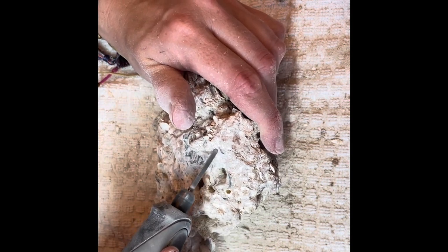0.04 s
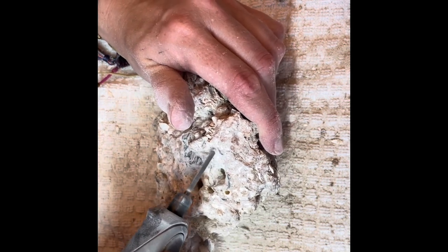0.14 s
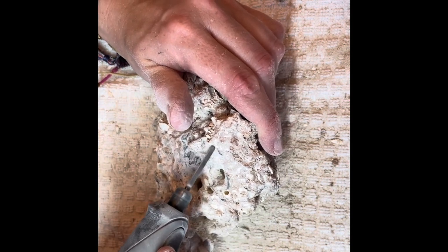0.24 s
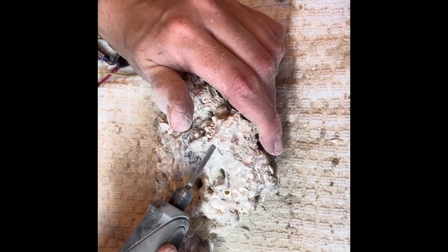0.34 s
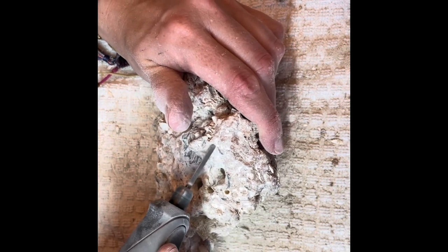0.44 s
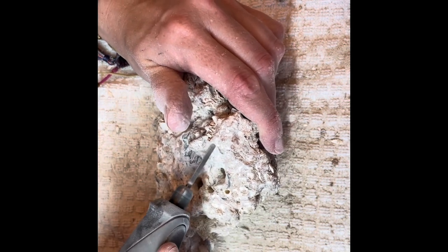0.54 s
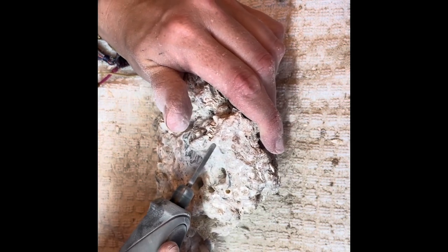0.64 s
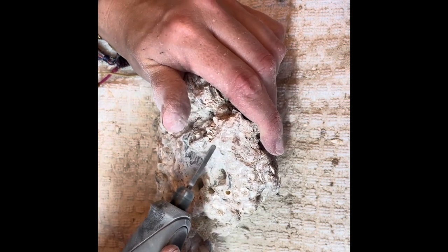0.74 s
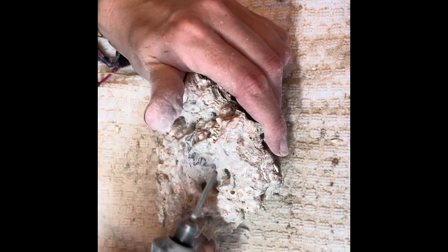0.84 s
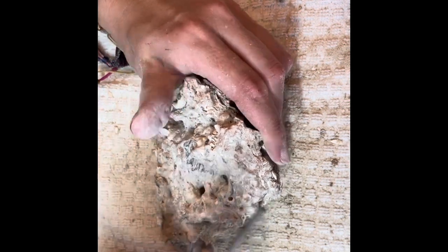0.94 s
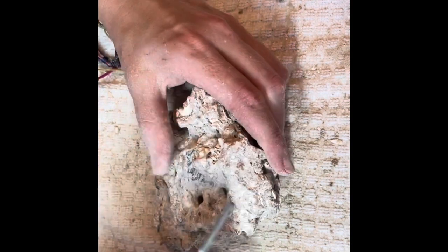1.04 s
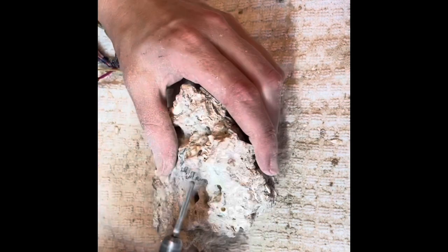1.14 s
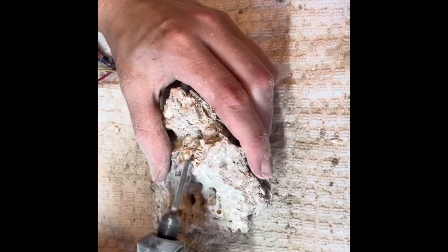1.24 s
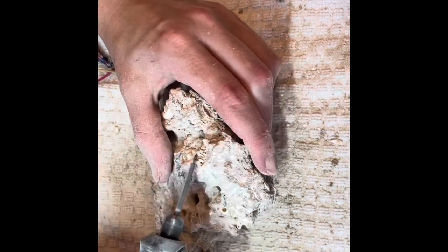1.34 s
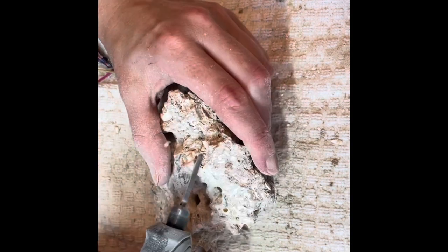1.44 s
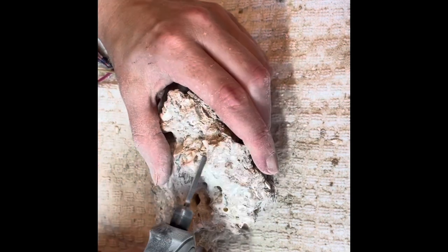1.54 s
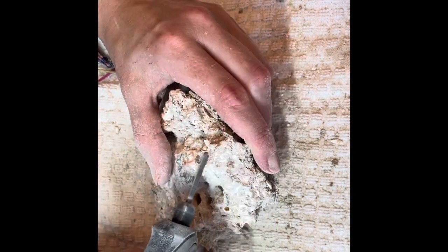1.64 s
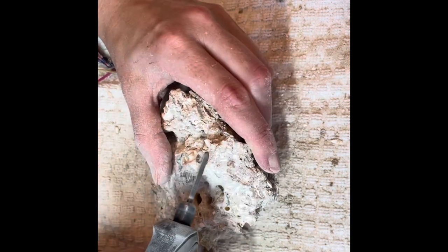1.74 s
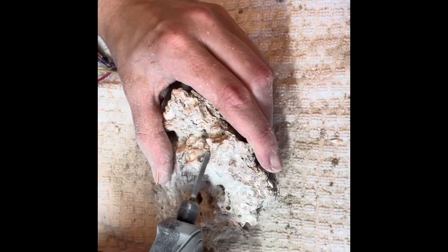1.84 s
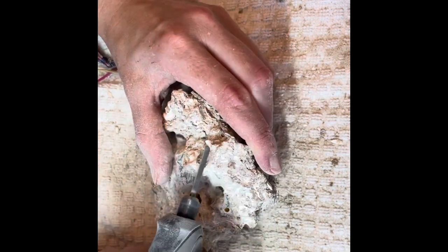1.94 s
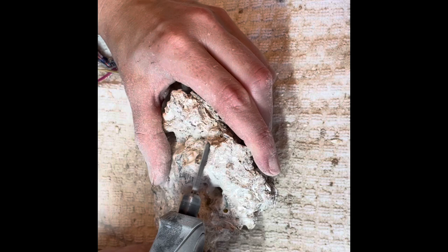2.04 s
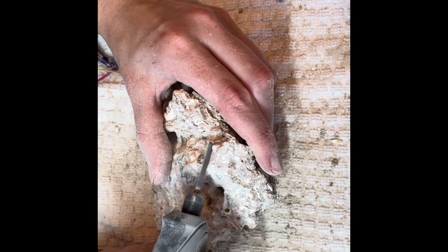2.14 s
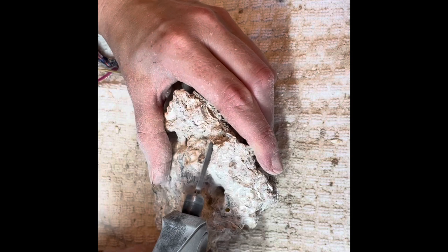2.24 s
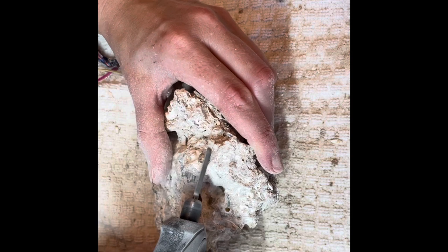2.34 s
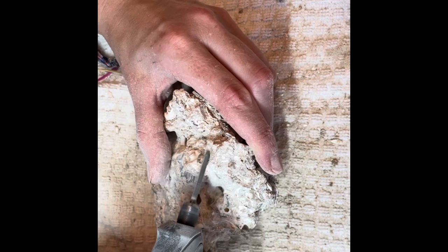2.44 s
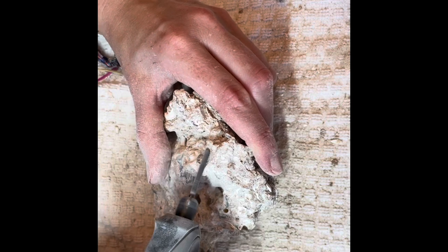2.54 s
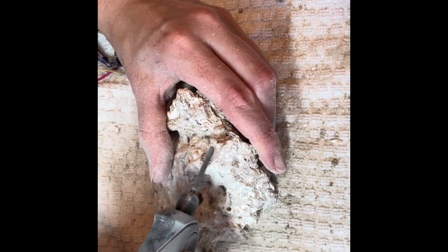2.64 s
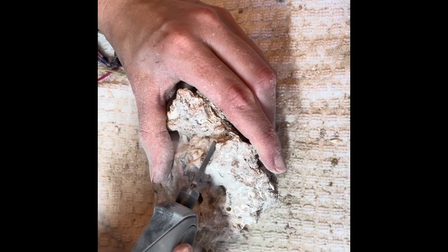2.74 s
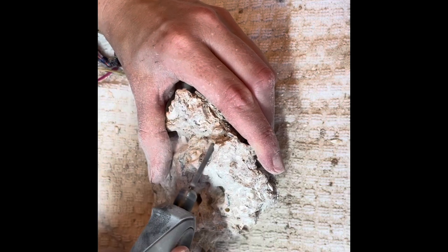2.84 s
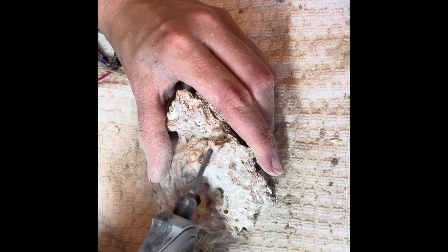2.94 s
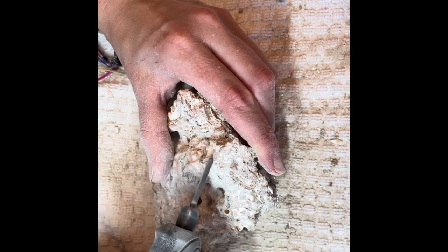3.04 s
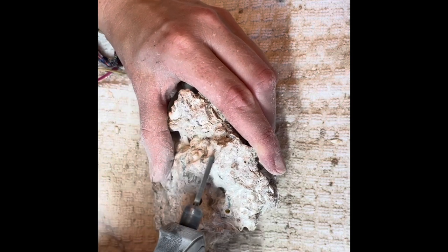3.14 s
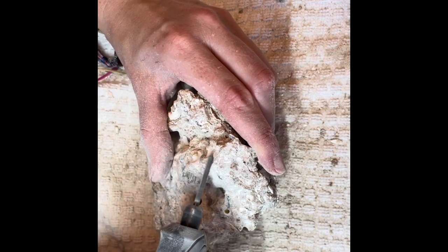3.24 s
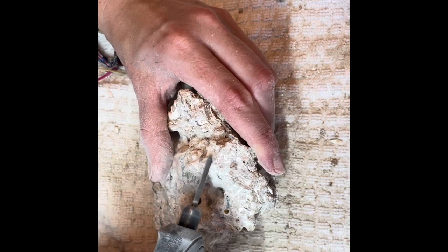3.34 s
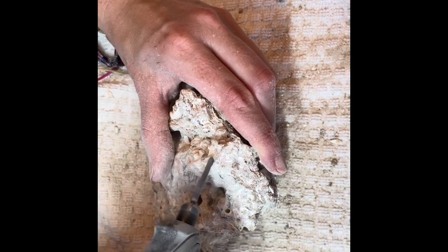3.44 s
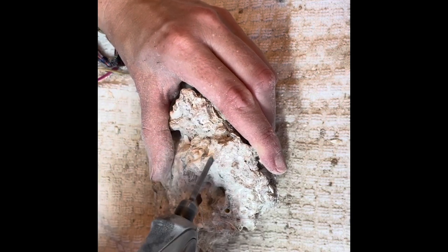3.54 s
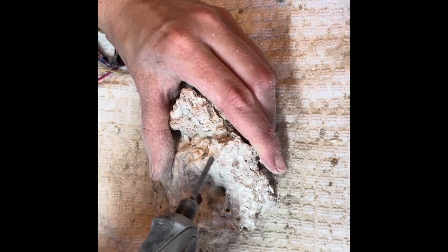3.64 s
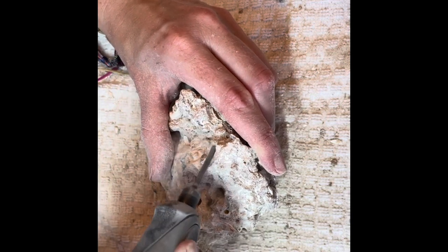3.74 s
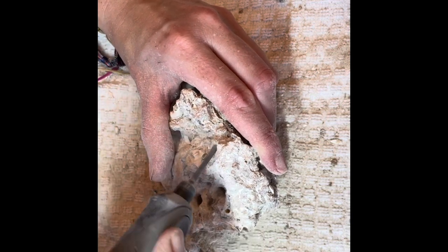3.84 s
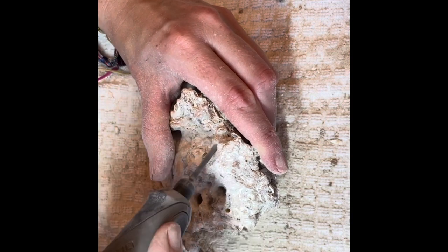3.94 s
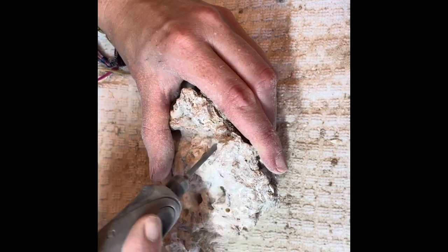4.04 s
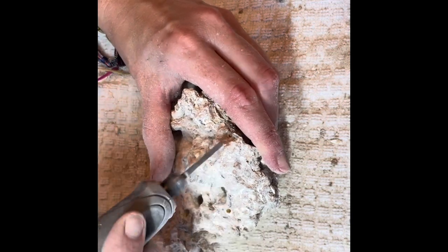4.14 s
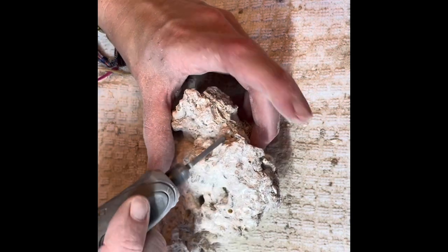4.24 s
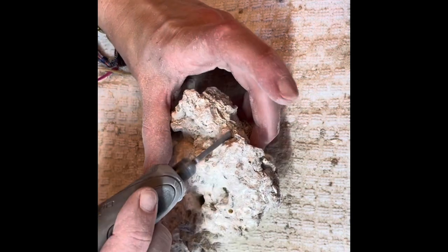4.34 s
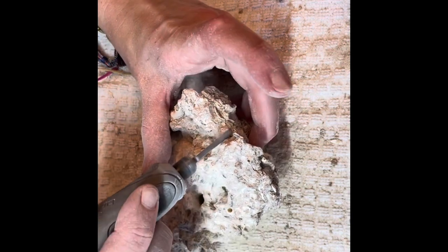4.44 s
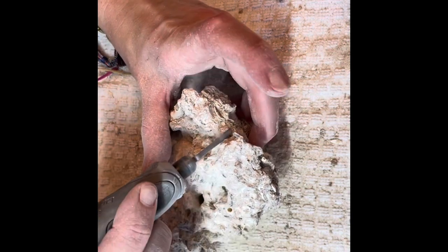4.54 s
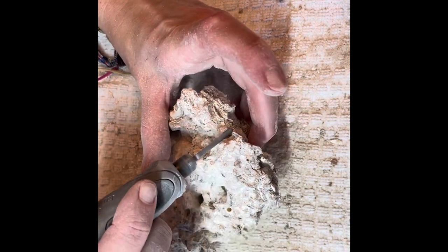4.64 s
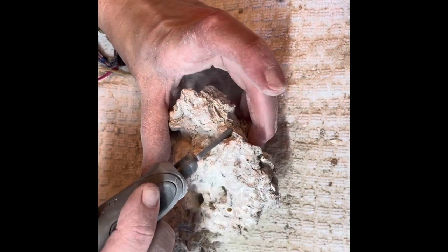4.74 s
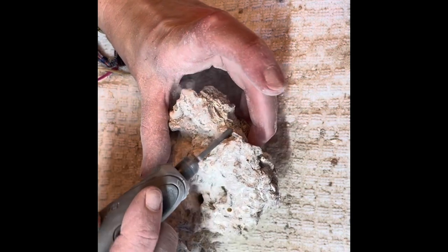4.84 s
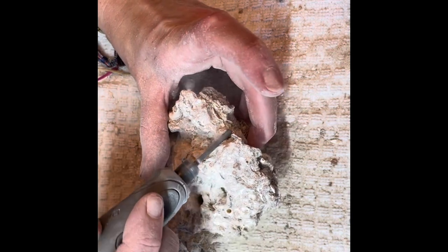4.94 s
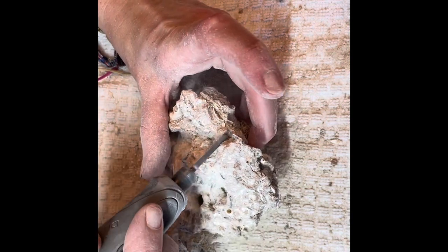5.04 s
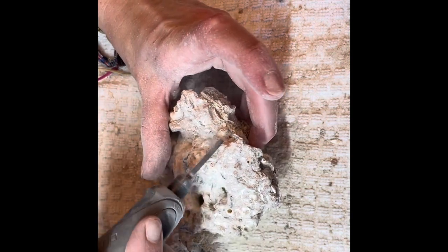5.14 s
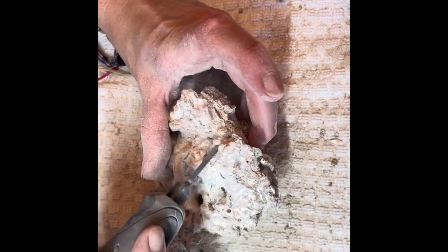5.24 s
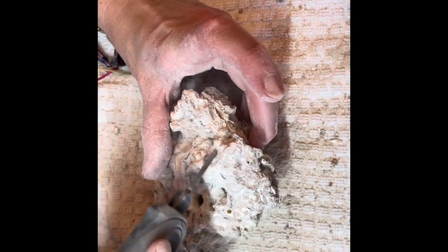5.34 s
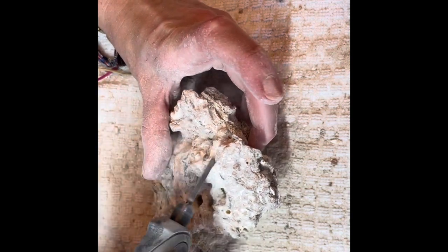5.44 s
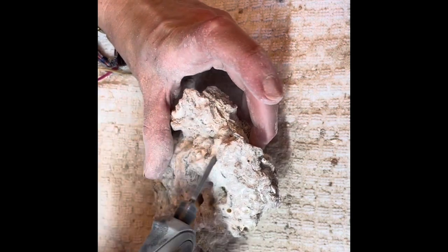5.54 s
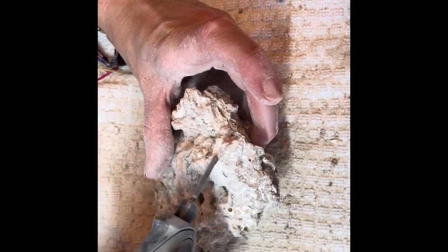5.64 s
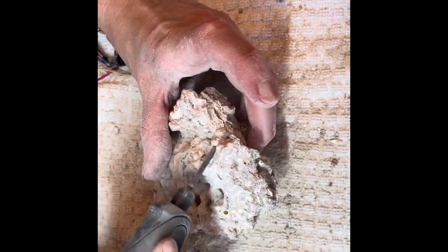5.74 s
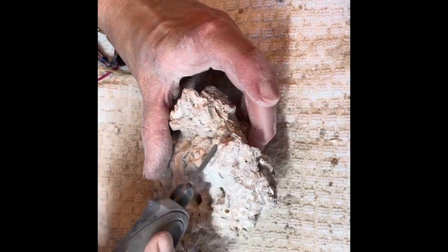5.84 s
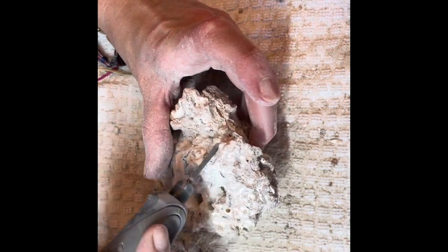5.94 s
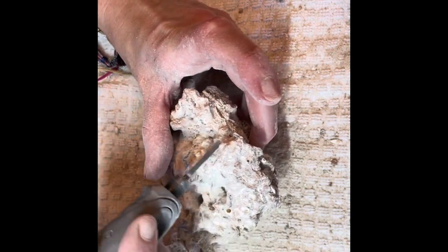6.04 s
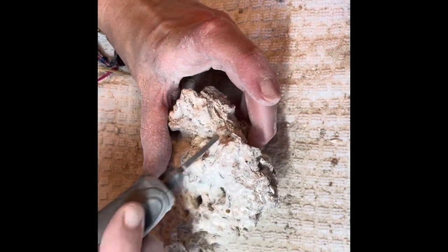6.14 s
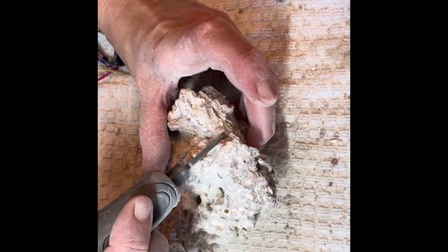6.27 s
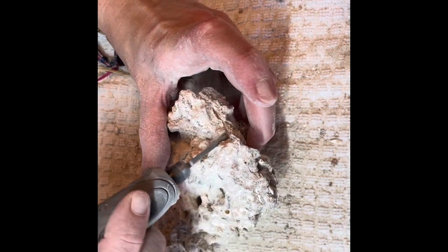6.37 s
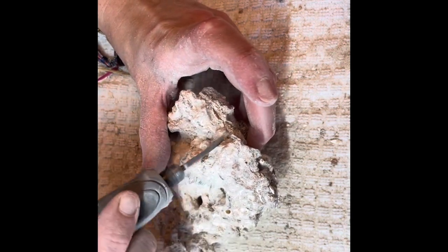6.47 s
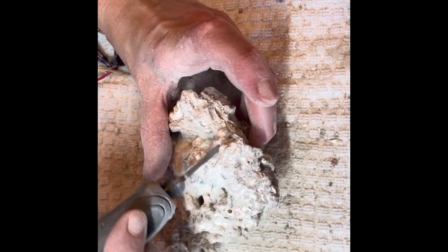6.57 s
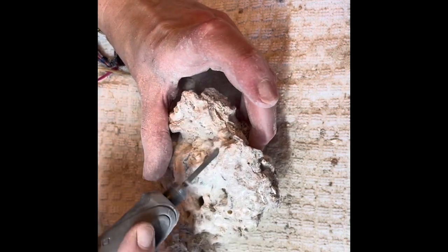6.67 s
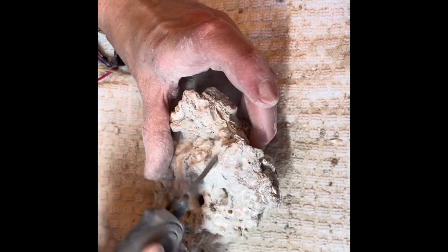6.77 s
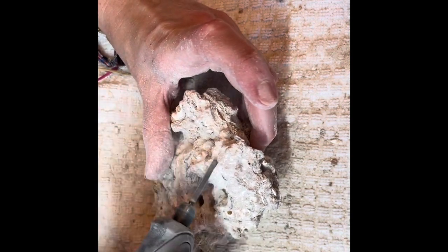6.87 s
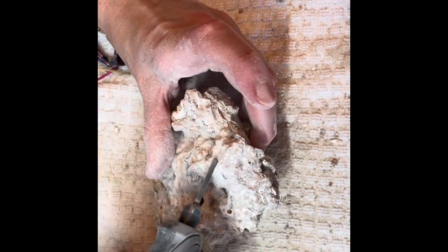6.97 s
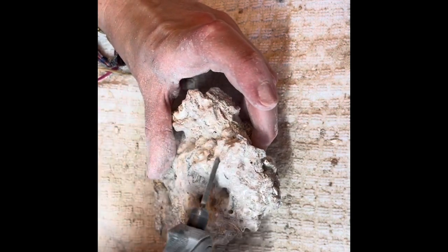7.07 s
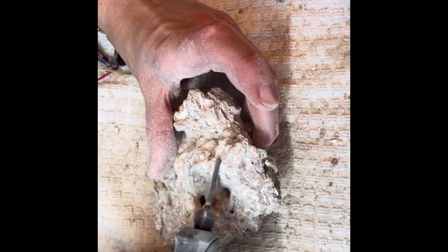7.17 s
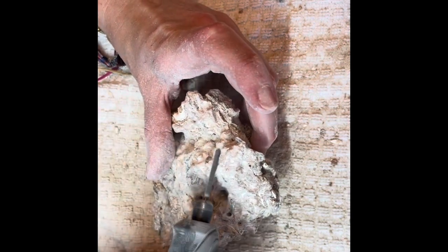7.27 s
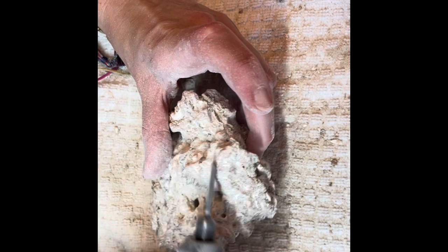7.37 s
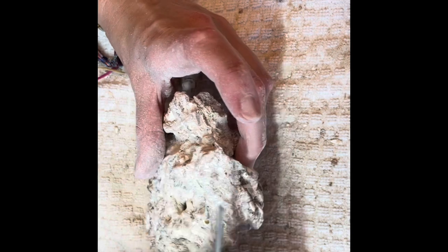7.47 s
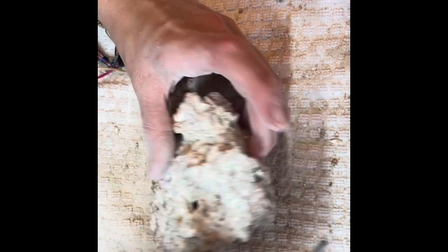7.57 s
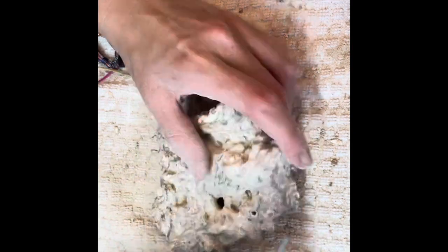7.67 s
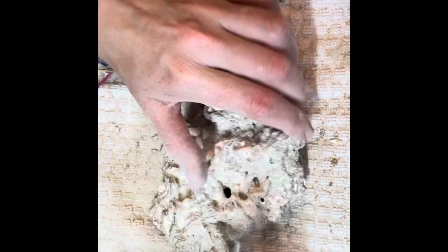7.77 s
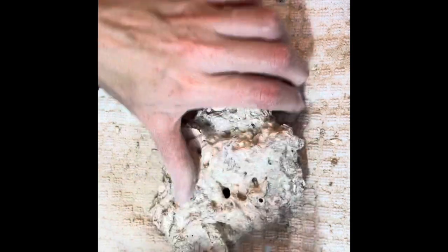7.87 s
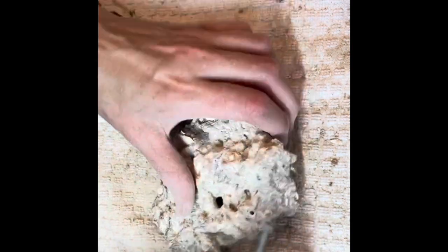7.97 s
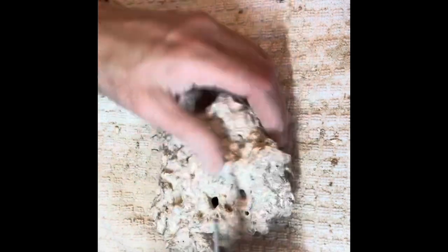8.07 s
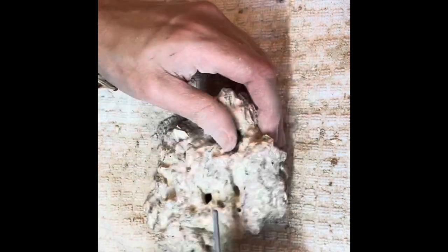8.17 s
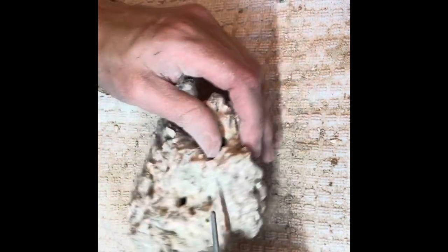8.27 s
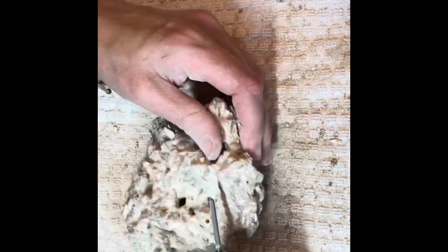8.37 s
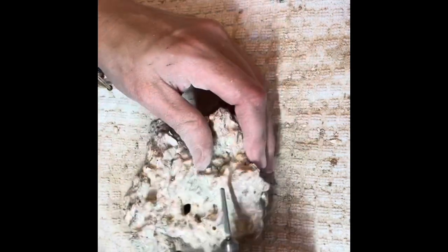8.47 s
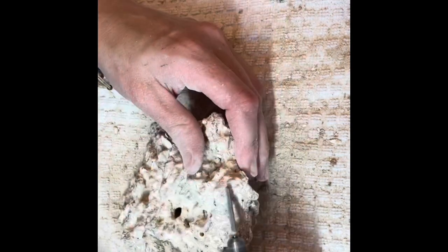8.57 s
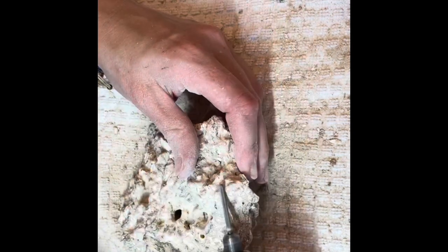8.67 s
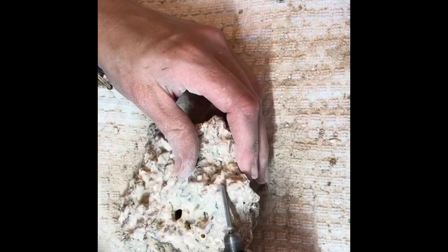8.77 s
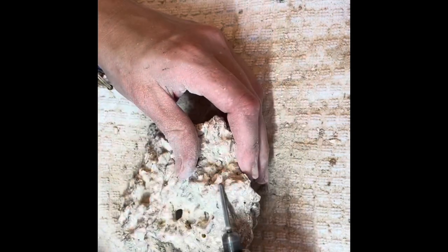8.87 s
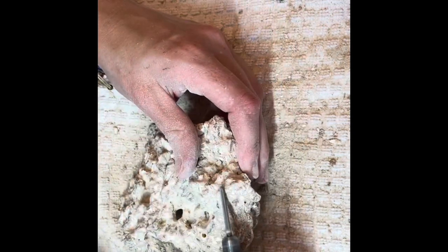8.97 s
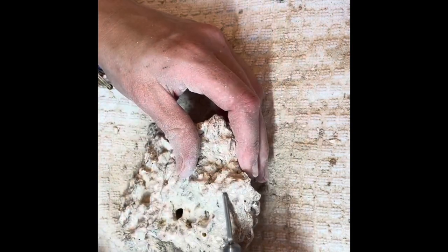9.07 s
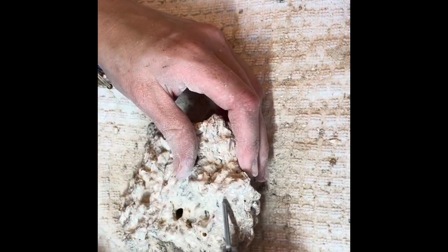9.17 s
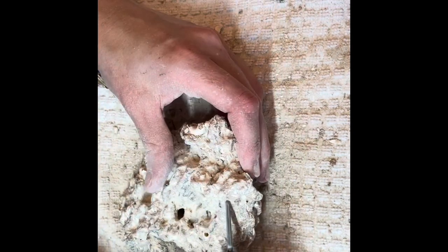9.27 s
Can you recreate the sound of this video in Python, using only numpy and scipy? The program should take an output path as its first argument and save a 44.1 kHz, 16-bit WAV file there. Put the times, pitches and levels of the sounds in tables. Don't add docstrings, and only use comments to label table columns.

```python
import sys
import numpy as np
from scipy import signal
from scipy.fft import rfft, irfft, next_fast_len
from scipy.io import wavfile
from scipy.ndimage import uniform_filter1d

SR = 44100
rng = np.random.default_rng(int(sys.argv[2]) if len(sys.argv) > 2 else 0)


def volts_from_decibels(level):
    exponent = np.asarray(level, float) / 20
    return 10 ** exponent


def put_to_file(sound):
    columns = np.atleast_2d(sound).T
    safe = np.clip(columns, -1, 1)
    whole_steps = np.round(safe * 32767)
    wavfile.write(sys.argv[1], SR, whole_steps.astype(np.int16))


N = 410571

# touch in seconds, lift in seconds, skid before seating in seconds,
# easing before the lift in seconds, entry level in dB.
STROKES = [
    (0.0, 0.081, 0.0046, 0.0064, 4),
    (0.232, .772, 0.18, 0.014, 0.8),
    (1.48, 4.134, 0.061, 0.035, -2),
    (4.284, 6.1, 0.073, 0.07, -3),
    (6.177, 7.361, 0.063, 0.031, -2),
    (8.649, 9.132, 0.032, 0.012, -2.5),
    (9.219, 9.369, 0.018, .005, -5.5),
]
# start in seconds, level in dB, decay in seconds.
TOUCHES = [(0.223, -34.5, 0.0043), (0.875, -54, .03), (1.045, -52, 0.033), (1.14, -50, .035),
           (1.451, -26, 0.0018), (1.469, -31, 0.0043), (4.1757, -39.5, 0.005), (4.183, -41.5, 0.008),
           (4.289, -43, .005), (4.208, -46.5, 0.016), (4.228, -41, 0.0099), (4.238, -38, 0.0078),
           (7.37, -42, 0.0057), (7.376, -37, 0.0072), (7.385, -47, 0.003), (7.65, -57, .02),
           (7.95, -54, 0.037), (8.6584, -55, 0.0055), (9.22, -43, 0.004)]
# time in seconds, speed in Hz.
PASSES_HZ = [
    [(0.0, 396.6), (.078, 437)],
    [(.233, 480.6), (.29, 468.4), (.37, 449), (.41, 431), (.47, 417.3), (.61, 388.2), (.68, 380.6),
     (.73, 391.7), (.775, 424.3)],
    [(1.48, 484), (1.58, 465.4), (1.62, 447), (1.74, 438.2), (1.82, 428.2), (1.91, 405.6), (1.94, 411),
     (1.98, 438)],
    [(2.1, 435.6), (2.18, 428.7), (2.26, 415.3), (2.37, 404.5), (2.5, 418), (2.55, 404.7), (2.66, 380),
     (2.735, 354.5)],
    [(2.79, 381), (2.88, 380.7), (2.94, 402.4), (3.02, 437), (3.12, 453.4), (3.26, 424.4), (3.34, 404),
     (3.38, 401.4), (3.46, 375.6)],
    [(3.55, 378.2), (3.66, 402), (3.7, 409), (3.74, 384.4), (3.78, 395), (3.82, 388.6), (3.87, 396.2),
     (3.99, 374.2), (4.06, 388), (4.146, 452)],
    [(4.28, 483.2), (4.34, 449.7), (4.47, 351.7), (4.51, 346), (4.73, 337.2), (4.815, 290), (4.86, 296),
     (4.9, 276.8), (4.94, 281)],
    [(4.99, 272.5), (5.03, 345), (5.06, 362.2), (5.18, 400), (5.26, 410.6), (5.3, 408), (5.39, 427.2),
     (5.6, 401)],
    [(5.7, 420), (5.74, 412.7), (5.78, 425.4), (5.82, 411), (5.94, 393.5), (6.05, 413.5), (6.1, 449.6)],
    [(6.177, 474.3), (6.24, 456), (6.32, 424), (6.46, 395), (6.54, 397.8), (6.61, 389.2), (6.76, 399.4),
     (6.8, 411)],
    [(6.88, 398), (6.97, 387.6), (7.04, 388.2), (7.12, 376.2), (7.26, 396.7), (7.36, 460)],
    [(8.645, 488.5), (8.7, 477), (8.78, 446), (8.93, 413.6), (8.98, 436.7), (9.02, 444), (9.06, 436.4),
     (9.13, 466.5)],
    [(9.219, 476.4), (9.31, 461)],
]
# time in seconds, pressure in dB, hollowness of the rock in dB.
LEAN = [(0.0, -45.5, -1), (.33, -48.5, 5.5), (.7, -45.5, 2), (1.5, -47, 4), (1.57, -42.5, -4.5),
        (1.85, -42.5, -2), (2.15, -46, -9), (2.75, -47, -1.5), (3.2, -48, -10.5), (3.47, -45, -7),
        (4.0, -46.5, 0.5), (4.5, -48, 1), (5.0, -46.5, 0), (5.6, -47.5, 0), (6.07, -47.5, 3), (6.4, -48, 3),
        (7.3, -47, -3.5), (8.8, -48, -1.5)]
# time in seconds, firmness in dB, half length in seconds, ring in Hz.
BITES = [(0.436, 6.5, 0.022, 3100), (0.655, 6.5, 0.13, 3270), (1.658, 3.5, 0.05, 3130),
         (1.794, 2.5, 0.071, 3240), (1.898, 5, 0.029, 3130), (1.992, 3.5, 0.018, 4130),
         (2.29, 4, 0.076, 3220), (2.505, 4, 0.073, 3320), (2.713, 3.5, 0.022, 3000), (2.91, 3, 0.084, 3240),
         (3.31, 2.5, 0.066, 3100), (3.42, 1, 0.024, 2400), (3.516, 2, .11, 3420), (3.687, 2, 0.028, 3180),
         (3.848, 4, 0.066, 3100), (4.43, 5, 0.036, 2980), (4.542, 6.5, 0.063, 3300), (4.652, 6, .03, 3100),
         (4.77, 4.5, 0.029, 2860), (4.937, 6, 0.085, 2361), (5.062, 6, 0.034, 3290), (5.14, 0, .04, 3150),
         (5.253, 6, 0.095, 3130), (5.45, 6, 0.11, 3350), (5.892, 6.5, 0.056, 3340), (6.285, 7, 0.015, 3640),
         (6.382, 4, 0.055, 3380), (6.47, 2.5, 0.062, 3600), (6.566, 4, 0.033, 3300),
         (6.666, 4, 0.035, 3350), (6.805, 5.5, 0.022, 3300), (6.917, 3, 0.075, 3300),
         (7.024, 3.5, .04, 3500), (7.17, 2, 0.07, 3040), (8.801, 6, 0.056, 3300), (8.915, 2.5, .015, 3200),
         (8.947, 6.5, 0.017, 3200), (9.024, 4.5, .03, 3300), (9.103, 4, 0.025, 2900),
         (9.263, -0.5, 0.055, 3400)]
# time in seconds, loose grit in dB, half length in seconds,
# level in dB.
GRAIN = [(0.437, -11, 0.037, 0.5), (0.528, 5.5, 0.055, -2), (0.608, -15, 0.06, 0.5), (0.7, -14, 0.02, 0.5),
         (1.585, 4, 0.02, 2.5), (1.765, -11.5, 0.056, 0.5), (1.846, -7.5, 0.037, 1.7),
         (1.895, 5, 0.044, -0.2), (1.99, -9, 0.032, -1), (2.056, 7, 0.021, -0.1), (2.21, 2.5, 0.028, 0),
         (2.32, 6, 0.026, 0), (2.366, -4, 0.053, 1), (2.575, 8, 0.051, -2), (2.715, 6, .02, 0),
         (2.955, -6, 0.034, -0.5), (3.112, -8, 0.042, 1), (3.203, -8, 0.029, 0.7), (3.404, -8, 0.062, 1.3),
         (3.51, -13, 0.018, 0.5), (3.622, -5, 0.07, 0.5), (3.69, 11.5, 0.044, -1.8),
         (3.817, -3, 0.035, 1.3), (3.914, -8, 0.02, 0.8), (4.46, 4.7, 0.045, 1.1), (4.562, 3, 0.038, 2.5),
         (4.61, 2, .015, -2.5), (4.722, 3, 0.022, -2), (4.848, 2, 0.016, -2.5), (4.873, -2, 0.015, 2.5),
         (5.004, 9, 0.041, -3), (5.11, 4.5, 0.06, -0.1), (5.204, -8, 0.015, 1.7), (5.288, -4, 0.05, 0),
         (5.382, 8.5, 0.029, -1.5), (5.704, 12, 0.045, -0.7), (5.847, -7, 0.055, -0.5),
         (6.374, -5, 0.025, -0.5), (6.472, 10, 0.031, -1.2), (6.56, 8.5, 0.085, -0.5),
         (6.707, -16, 0.054, 1), (6.765, 7.5, 0.025, 0.5), (7.023, 3.5, 0.06, -0.5),
         (7.15, -5.5, 0.057, -0.3), (7.267, 8, 0.033, -0.3), (8.743, -7, 0.034, 3), (8.82, -11, 0.035, 1.2),
         (9.022, -10, 0.047, 1), (9.245, -8, 0.024, 3)]
# time in seconds, gain in dB,
HOLLOWS = [(.05, -4.5, 0.076, 3040), (1.6, 3.5, 0.087, 5100), (1.8, 3.5, 0.072, 1400),
           (2.0, 9, 0.039, 4500), (2.06, 8.5, 0.024, 4860), (2.38, 3, .1, 4100), (2.71, 6, 0.038, 2960),
           (2.95, 4.5, .08, 4740), (3.12, 8, .1, 4370), (3.41, 5, 0.026, 5330), (3.7, 4.5, 0.03, 3200),
           (4.45, 8, 0.089, 2200), (4.47, 3, 0.037, 5700), (4.65, 8, 0.18, 5600), (4.79, 3, 0.049, 5140),
           (4.88, 3, 0.033, 4900), (4.8, 3, 0.17, 2640), (5.25, -4, 0.14, 4730), (6.35, -2.5, 0.17, 2100),
           (6.55, 1, 0.14, 3470), (6.9, -5.5, 0.22, 2170), (7.276, 5.5, 0.052, 4800),
           (8.76, 7.5, 0.053, 5500), (8.88, 6, 0.085, 5900), (8.95, 4.5, 0.088, 1300),
           (9.26, 4.5, .05, 3700), (.45, 1.5, .07, 1500), (1.744, 3, .1, 2200), (4.93, 0.5, 0.046, 2400),
           (9.08, 8.5, 0.057, 1600), (.3, 9, .06, 650), (2.35, -6, .15, 640), (3.15, -6, .2, 640),
           (4.63, 6, 0.07, 690), (5.55, 7, .3, 680), (6.45, 9, 0.28, 660), (7.0, 5, 0.11, 960),
           (8.9, -6, .25, 640), (3.42, 4, 0.044, 2300), (2.2, -1.5, 0.083, 4400), (.63, -5, 0.1, 2550),
           (4.78, 3.5, .03, 3420), (4.893, 3, 0.028, 3300), (4.6, -7, .12, 480)]
# frequency in Hz, level in dB per Hz.
STONE = [(520, -32), (640, -31), (1000, -18.5), (1300, -14.5), (2100, -12.5), (3200, -3), (3900, -9),
         (5100, -8.5), (6100, -10), (7400, -3.5), (9000, -8.5), (11000, -4), (13000, -7.5), (15500, -12.5)]
# time in seconds, level in dB.
THRUM = [(0.0, -88), (.33, -86), (.77, -97), (1.5, -86), (1.7, -85.5), (2.3, -90.5), (2.62, -90),
         (3.47, -88.5), (4.75, -89), (5.55, -88), (5.99, -89.5), (3.8, -94), (2.0, -88), (1.0, -97),
         (6.95, -87), (7.15, -92), (9.0, -102)]
# frequency in Hz, level in dB per Hz.
BENCH = [(60, -35), (130, -5), (170, 3), (230, -5.5), (300, -11.5), (460, -24), (900, -32)]
# time in seconds, whine in dB, brush hiss in dB, once-a-turn tone in dB,
# its octave in dB.
IDLE = [(.16, -59.5, -68.5, -93, -78), (.83, -60, -68, -101, -78.5), (.9, -56.5, -67, -87, -78.5),
        (1.25, -56.5, -68, -85, -84.5), (4.2, -61, -73, -94.5, -78), (6.15, -61.5, -71.5, -90.5, -76),
        (7.55, -62, -67.5, -99, -92), (7.9, -61, -66.5, -87, -108), (8.3, -61.5, -73, -103, -110),
        (8.6, -61, -71, -100, -95), (8.68, -67, -74, -84, -97), (8.8, -62, -73, -103, -96),
        (9.18, -64, -69.5, -104, -85.5), (9.28, -57, -66, -75, -74)]
# time in seconds, level in dB.
UNBALANCE_TOP = [(0, -76.5), (.33, -87), (.62, -75), (1.6, -82.5), (1.8, -77), (2.4, -84.5), (2.7, -75),
                 (3.0, -84), (3.3, -83.5), (3.6, -74), (4.0, -78.5), (4.5, -80.5), (5.1, -78), (5.4, -82.5),
                 (5.9, -78), (6.75, -79), (7.2, -78.5), (8.9, -78)]
# multiple of half the shaft speed, level in dB.
WHINE = [(5, -14.5), (7, -18.5), (9, -18), (11, -7.5), (13, -8.5), (15, -21), (17, -11), (21, -14),
         (30, -8.5), (32, -11.5), (36, -14)]
GRIP = {6: [(0, -14.5), (.9, -11), (1.14, -26.5), (7.48, -12), (8.08, -18)], 8: [(0, -14), (.9, -15.5),
        (7.4, -9), (8.4, -22.5)], 10: [(0, -5.5), (.85, -4), (1.14, -9), (7.58, -2.5), (8.1, -12),
        (8.4, -1)], 12: [(0, -13.5), (.8, -0.5), (1.18, 4), (2.0, -11), (7.38, 5), (7.5, -2), (7.6, -22),
        (7.7, -4), (8.0, -4), (8.1, 1.5), (8.4, 3), (9.1, 6)], 14: [(0, -5), (.8, -14), (1.14, -5.5),
        (7.0, -26), (7.68, -1.5)], 16: [(0, -15), (1.24, -9), (8.0, -24), (8.4, -14)], 18: [(0, -12.5),
        (1.24, -13.5), (7.0, -16), (7.68, -7), (7.98, -10.5), (8.42, -23)], 20: [(0, -11), (1.03, -10),
        (1.24, -18.5), (7.0, -17), (8.08, -25), (8.4, -20)]}
# time in seconds, level in dB.
WOBBLING = [
    (0, -15),
    (.84, -10),
    (1.13, 4.5),
    (1.45, -12),
    (7.92, -1),
    (8.64, -11),
    (9.1, 2),
]
# frequency in Hz, level in dB per Hz.
HOUSING = [(300, 2.5), (700, -19), (1100, -17), (1450, -11.5), (2200, -7), (2900, -1.5), (3400, -10),
           (3700, -14), (4400, -14), (5800, -23.5), (7500, -12), (9000, -16.5), (11500, -14),
           (15500, -18.5)]
# frequency in Hz, level in dB per Hz.
AIR = [(15, -44), (25, -22), (76, -1), (151, -11), (310, -11), (361, -14), (479, -28), (900, -38),
       (1170, -48), (1980, -120)]
# time in seconds, gain in dB.
LOW_AIR_LEVEL = [(0, 3.5), (2.1, 1), (4.1, 0), (5.3, -2), (7.5, 0), (8.7, 4)]
# frequency in Hz, level in dB.
HUM = [
    (87, -99.5),
    (177, -106),
    (317.6, -99),
    (538, -107),
]
# frequency in Hz, left lead in radians.
PORTS = [(300, 0.059), (800, 0.68), (1500, 0.058), (3300, 0.36), (4000, 1.26), (6100, 0.53), (7000, 0.83),
         (8300, 0.15), (9100, 1.36), (10200, 2.19), (11500, 4.22), (13000, 4.14), (15300, 6.5)]
# frequency in Hz, share in dB.
DIFFUSE = [(100, -31), (400, -21), (800, -16), (1600, -23), (3000, -16), (4200, -13.5), (6000, -9.5),
           (7500, -16), (9500, -16.5), (12000, -12.5), (14300, -6.5)]
# low edge in Hz, high edge in Hz.
SUM_GAP_HZ = (10466, 12940)
# low edge in Hz, high edge in Hz.
DIFFERENCE_GAPS_HZ = [(1500, 3200), (7000, 8800), (14600, 22050)]
SUM_WHOLE_S = [.23, 1.45, 4.19, 4.29, 5.2, 6.18, 7.36, 7.385, 8.65, 9.22]

FREE_HZ, RECOVER_S = 484, .036
RING_HZ, SCRAPE_DB, BODY_DB = 3300, 4.5, -11.5
BODY_YIELDS = 1.33
LIGHT_DB, LIGHT_HZ, EASE_DB = -7, 22.8, -11
SKID_DB = 13
HOLLOW_WIDTH = 0.13
THRUM_S, STILL_DB = .12, -99
UNBALANCE_DB_PER_HZ = 0.24
SHIFT_S = .05
TOP_HZ = 15850


def grinding(turns, speed_hz):
    touching, unseated = contact()
    lean_db, hollow_db = curves(LEAN)
    at_s, firm_db, half_s, bite_hz = np.transpose(BITES)
    firm_db, shift_hz = swells(at_s, half_s, firm_db, bite_hz - RING_HZ)
    ring_hz = RING_HZ + shift_hz
    at_s, crumb_db, half_s, surge_db = np.transpose(GRAIN)
    crumb_db, surge_db = swells(at_s, half_s, crumb_db, surge_db)

    scrape_db = SCRAPE_DB - firm_db
    body_db = BODY_DB - BODY_YIELDS * firm_db + hollow_db + 2.5 * wobble(9)
    light_db = LIGHT_DB * np.exp((speed_hz - FREE_HZ) / LIGHT_HZ)
    press_db = lean_db + light_db - scrape_db + surge_db

    bite = np.exp(0.3 * np.cos(2 * np.pi * turns + 1.51 * wobble(12)))
    grit = unit(bite * volts_from_decibels(2.2 * wobble(900)) * rng.standard_normal(N))
    strike = unit(bite * relief(turns + .0045 * wobble(60), lasting=14))
    chatter = volts_from_decibels(0.36 * wobble(35) + 1.1 * wobble(110))
    loose_db = 2 * wobble(22) + crumb_db + SKID_DB * unseated - .7 * (firm_db - 2)

    def mix(base_db):
        share = volts_from_decibels(base_db + loose_db)
        return (strike + share * grit) / (1 + share ** 2) ** 0.39

    clear = 1 / (1 + volts_from_decibels(3.6 * scrape_db - 2.8 + 0.71 * crumb_db + SKID_DB * unseated))
    rasp = band(mix(-6), STONE, low_hz=1900, high_hz=4300)
    singing = song(turns, speed_hz, ring_hz, width_hz=340 - 20 * np.clip(firm_db, 0, 8))
    middle = np.sqrt(clear) * singing + np.sqrt(1 - clear) * rasp
    upper = volts_from_decibels(scrape_db + 1.5) * band(mix(-4.5), STONE, low_hz=4300, high_hz=16500)
    lower = volts_from_decibels(body_db + .1) * band(mix(-12), STONE, low_hz=550, high_hz=1900)
    cut = touching * chatter * volts_from_decibels(press_db) * patchy(middle + upper + lower, depth_db=0.84)
    return cut + brief_touches(grit) + bench_shake(turns, touching)


def contact():
    t = np.arange(N) / SR
    touching, unseated = np.zeros(N), np.zeros(N)
    for touch_s, lift_s, skid_s, ease_s, entry_db in STROKES:
        gate = np.clip(np.minimum((t - touch_s) / 0.00042, (lift_s + 0.0088 - t) / 0.023), 0, 1)
        easing_db = EASE_DB * np.exp(-abs(lift_s - t) / ease_s)
        entering_db = entry_db * np.exp(-((t - touch_s) / skid_s) ** 2)
        touching += gate * volts_from_decibels(easing_db + entering_db)
        unseated += np.exp(-((t - touch_s) / skid_s) ** 4) + np.exp(-((t - lift_s) / ease_s) ** 2)
    return touching, unseated


def song(turns, speed_hz, ring_hz, width_hz):
    angle, speed, ring = np.float32([2 * np.pi * (turns % 1), speed_hz / width_hz, ring_hz / width_hz])
    tones, power = 0, 0
    for k in range(5, 13):
        gain = np.exp(.45 * wobble(50)) / (1 + (k * speed - ring) ** 2) ** 1.5
        tones = tones + gain * np.sin(k * angle + .8 * wobble(60))
        power = power + gain * gain
    return np.sqrt(2) * tones / np.sqrt(uniform_filter1d(power, size=900))


def relief(turns, lasting, size=128):
    fresh = rng.standard_normal((4200, size))
    keep = np.exp(-1 / max(lasting, .1))
    worn = signal.lfilter([1], [1, -keep], fresh, axis=0)
    angle = (turns % 1 * size).astype(int)
    return unit(worn[turns.astype(int) + 50, angle])


def patchy(x, depth_db):
    hz, t, z = signal.stft(np.float32(x), SR, nperseg=512)
    field = uniform_filter1d(rng.standard_normal(z.shape), size=7, axis=0)
    field = uniform_filter1d(field, size=6, axis=1)
    at_s, db, half_s, peak_hz = np.transpose(HOLLOWS)
    across = np.exp(-((hz[:, None] / peak_hz - 1) / HOLLOW_WIDTH) ** 2)
    during = np.exp(-((t - at_s[:, None]) / half_s[:, None]) ** 2)
    gain_db = depth_db * unit(field) + db * across @ during
    return signal.istft(z * volts_from_decibels(np.float32(gain_db)), nperseg=512)[1][:N]


def brief_touches(grit):
    t = np.arange(4000) / SR
    skips = np.zeros(N)
    for start_s, db, decay_s in TOUCHES:
        i = round(start_s * SR)
        skips[i:i + 4000] += volts_from_decibels(db - 9.5) * np.exp(-t / decay_s)[:N - i]
    return uniform_filter1d(skips, size=30) * band(grit, STONE, low_hz=1500, high_hz=16300)


def bench_shake(turns, touching):
    at_s, db = np.transpose(THRUM)
    thrum = volts_from_decibels(STILL_DB) + swells(at_s, THRUM_S, volts_from_decibels(db))[0]
    rocking = 0.66 * touching * np.sin(np.pi * turns + 1.5 * wobble(24))
    rumble = band(rng.standard_normal(N), BENCH, low_hz=50, high_hz=1000)
    return thrum * volts_from_decibels(3.4 * wobble(7.7)) * (rumble + rocking)


def shaft():
    t = np.arange(N) / SR
    sag_hz = FREE_HZ - curves([row for rows in PASSES_HZ for row in rows])[0]
    for (_, lift_s, *_), (touch_s, *_) in zip(STROKES, STROKES[1:]):
        free = slice(round(lift_s * SR), round(touch_s * SR))
        sag_hz[free] = sag_hz[free.start] * np.exp((lift_s - t[free]) / RECOVER_S)
    sag_hz = uniform_filter1d(sag_hz, size=900)
    loaded_db = curves(IDLE)[2] + UNBALANCE_DB_PER_HZ * sag_hz
    unbalance_db = np.minimum(loaded_db, curves(UNBALANCE_TOP)[0]) + 2 * wobble(12)
    return FREE_HZ - sag_hz * (1 + .012 * wobble(45)), unbalance_db


def motor(turns, speed_hz, unbalance_db):
    whine_db, hiss_db, _, octave_db = curves(IDLE)
    half_turn = (np.pi * (turns % 2)).astype(np.float32)
    rattle = volts_from_decibels(0.041 * (speed_hz - speed_hz.max())).astype(np.float32)
    halves = rattle * held(WOBBLING)

    steady, gripped = np.zeros(N), np.zeros(N)
    for k, db in WHINE:
        swell = halves * (1 + .3 * wobble(5)) if k % 2 else rattle * (1 + .5 * wobble(6))
        steady += volts_from_decibels(db) * swell * np.sin(k * half_turn + k * k)
    for k, steps in GRIP.items():
        gripped += held(steps) * np.sin(k * half_turn + k * k)
    orders = steady + (1 + 0.16 * wobble(12)) * gripped

    sparks = volts_from_decibels(1.0 + 3.5 * wobble(500)) * rng.standard_normal(N)
    brushes = relief(turns / 2, lasting=47, size=256) + sparks
    low = volts_from_decibels(-13.5) * (0.45 + 0.7 * rattle) * band(brushes, HOUSING, low_hz=627, high_hz=5360)
    high = volts_from_decibels(hiss_db + 3.0) * band(brushes, HOUSING, low_hz=5540, high_hz=17400)

    octave_db = octave_db * rattle + (1 - rattle) * (-92.5 + 4.2 * wobble(8.9))
    shaking = volts_from_decibels(unbalance_db) * np.sin(2 * half_turn) + volts_from_decibels(octave_db) * np.sin(4 * half_turn)
    return volts_from_decibels(whine_db) * (volts_from_decibels(-7.0) * orders + low) + high + np.sqrt(2) * shaking


def room():
    t = np.arange(N) / SR
    drift = held(LOW_AIR_LEVEL) * volts_from_decibels(-94.0 + 1.454 * wobble(1.3))
    out = drift * band(rng.standard_normal(N), AIR, low_hz=15, high_hz=1500)
    for hz, db in HUM:
        tone = np.sin(2 * np.pi * hz * t + 1.1 * wobble(6.9))
        out += np.sqrt(2) * volts_from_decibels(db + 3.1 * wobble(4.8)) * tone
    return out


def ports(x):
    side = np.array([[1], [-1]])
    return filtered(x, lambda hz: np.exp(.5j * along(PORTS, hz) * side)) * volts_from_decibels([[-0.2], [0.2]])


def unit(x):
    return x / np.sqrt(np.mean(x ** 2) + 1e-20)


def along(points, hz):
    f, v = np.transpose(points)
    return np.interp(np.log(hz + 1), np.log(f + 1), v)


def curves(rows):
    s, *cols = np.transpose(rows)
    return [np.interp(np.arange(N) / SR, s, c) for c in cols]


def swells(at_s, half_s, *heights):
    t = np.arange(0, N / SR + .01, 1 / 200)
    bells = np.exp(-((t - np.reshape(at_s, (-1, 1))) / np.reshape(half_s, (-1, 1))) ** 2)
    return curves(np.transpose([t, *(h @ bells for h in heights)]))


def held(steps):
    rows, was_db = [], steps[0][1]
    for s, db in steps:
        rows += [(s, was_db), (s + SHIFT_S, db)]
        was_db = db
    return volts_from_decibels(curves(rows)[0])


def wobble(rate_hz, size=8):
    knots = rng.standard_normal(int(N * rate_hz / SR) + 4)
    coarse = np.interp(np.arange(0, N, size) * (rate_hz / SR), np.arange(len(knots)), knots)
    return np.repeat(coarse.astype(np.float32), size)[:N]


def filtered(x, response):
    m = 2 * next_fast_len(N // 2 + 4096)
    z = rfft(x.astype(np.float32), m) * response(np.fft.rfftfreq(m, 1 / SR))
    return irfft(z.astype(np.complex64), m)[..., :N]


def band(x, spectrum, low_hz, high_hz):
    grid = np.geomspace(10, SR / 2, num=500)
    edges = np.sqrt((1 + (low_hz / grid) ** 8) * (1 + (grid / high_hz) ** 8))
    gain = volts_from_decibels(along(spectrum, grid)) / edges
    return unit(filtered(x, lambda hz: np.interp(hz, grid, gain)))


def scene():
    speed_hz, unbalance_db = shaft()
    turns = np.cumsum(speed_hz) / SR
    return ports(grinding(turns, speed_hz) + motor(turns, speed_hz, unbalance_db) + room())


def low_pass(x):
    return signal.sosfilt(signal.butter(12, 17100, fs=SR, output="sos"), x)


def record(dry):
    both = np.float32([dry[0] + dry[1], dry[0] - dry[1]])
    hz, t, z = signal.stft(both, SR, nperseg=2048)

    def edge(at_hz):
        return at_hz * (1 + 0.028 * rng.standard_normal(len(t)))

    def outside(low_hz, high_hz):
        return (hz[:, None] < edge(low_hz)) | (hz[:, None] > edge(high_hz))

    scatter = np.repeat(rng.standard_normal((2, 257, len(t))), 4, axis=1)[:, :len(hz)]
    z[1] += volts_from_decibels(along(DIFFUSE, hz))[:, None] * (scatter[0] + 1j * scatter[1]) * (z[0] + z[1])

    whole = abs(t - np.reshape(SUM_WHOLE_S, (-1, 1))).min(axis=0) < .014
    keep_sum = (outside(*SUM_GAP_HZ) | whole) * (hz[:, None] < TOP_HZ)
    keep_difference = np.ones(keep_sum.shape, bool)
    for low_hz, high_hz in DIFFERENCE_GAPS_HZ:
        spared = (rng.random(len(t)) < .1) * (high_hz < TOP_HZ)
        keep_difference &= outside(low_hz, high_hz) | whole | spared
    low = uniform_filter1d(abs(z[0, :48]), size=3, axis=0)
    keep_sum[:48] &= low > volts_from_decibels(-25) * low.max(axis=0)

    z[1] *= np.exp(0.45j * rng.standard_normal(len(t)))
    kept = z * np.array([keep_sum, keep_difference])
    mid, side = signal.istft(kept, SR, nperseg=2048)[1][:, :N] / 2
    return low_pass(np.array([mid + side, mid - side]))


dry = scene()
out = record(dry)
put_to_file(out)
```